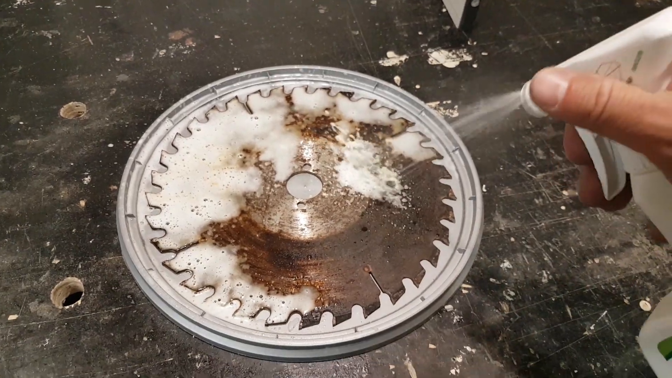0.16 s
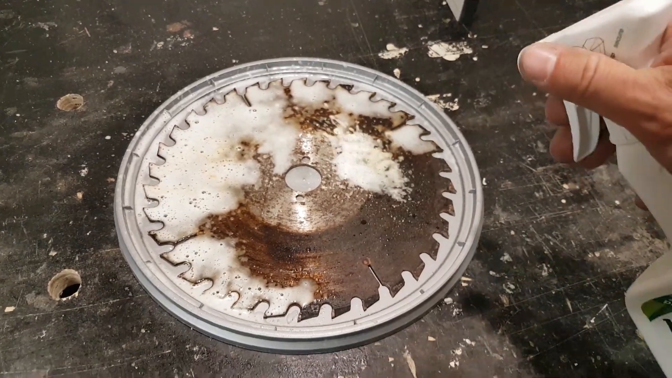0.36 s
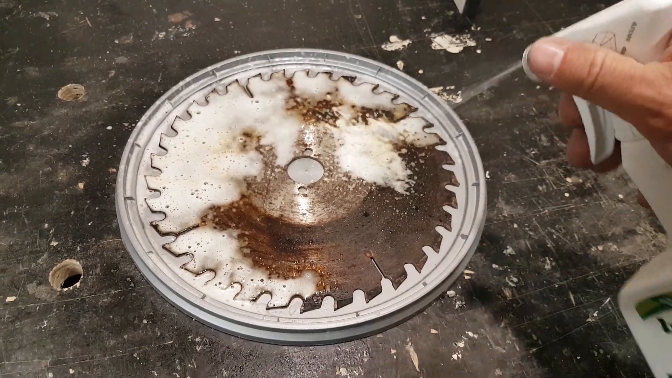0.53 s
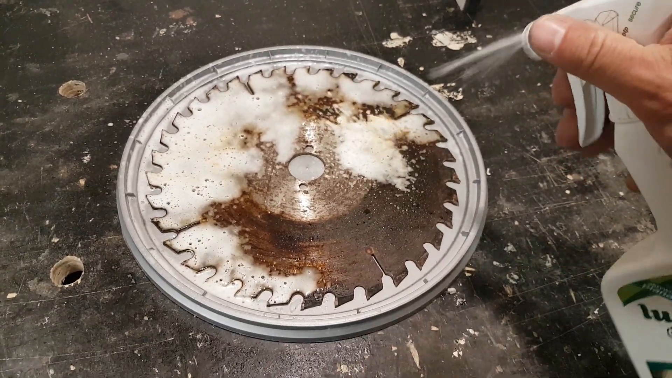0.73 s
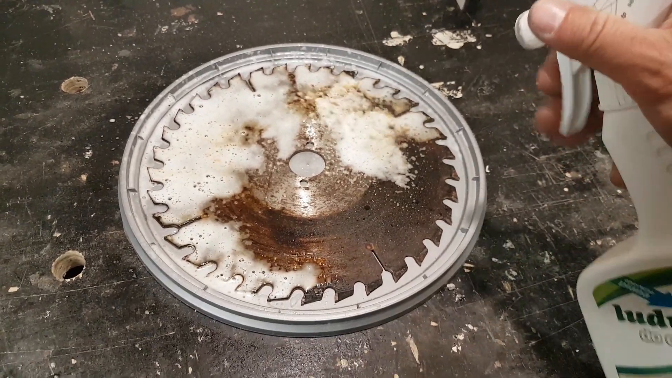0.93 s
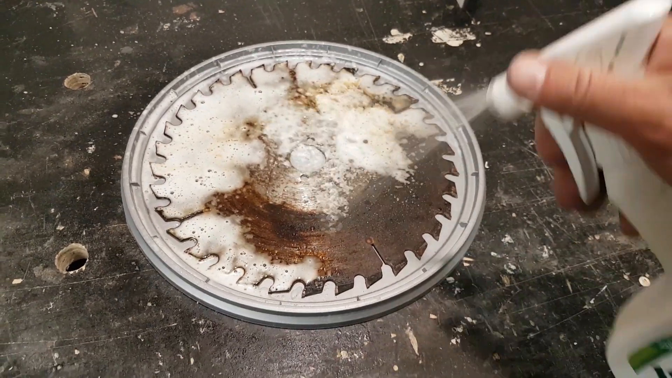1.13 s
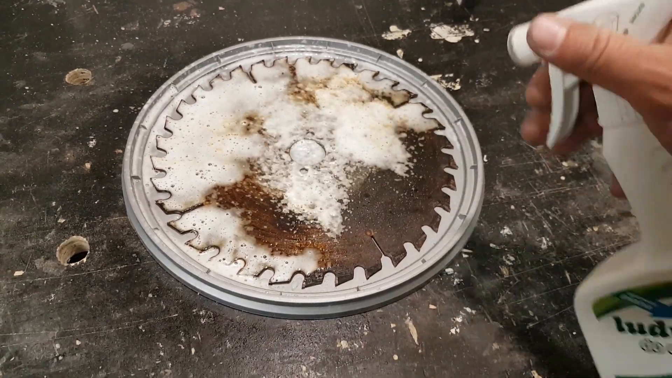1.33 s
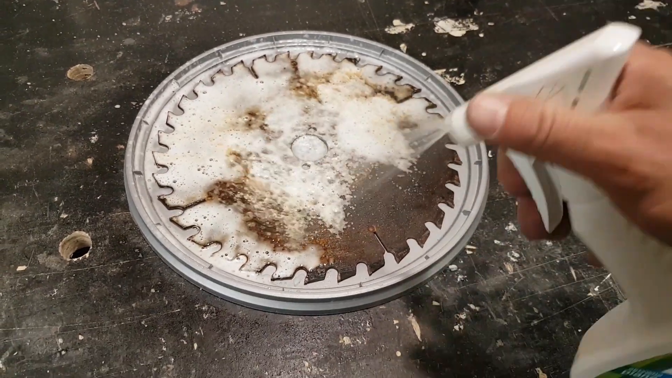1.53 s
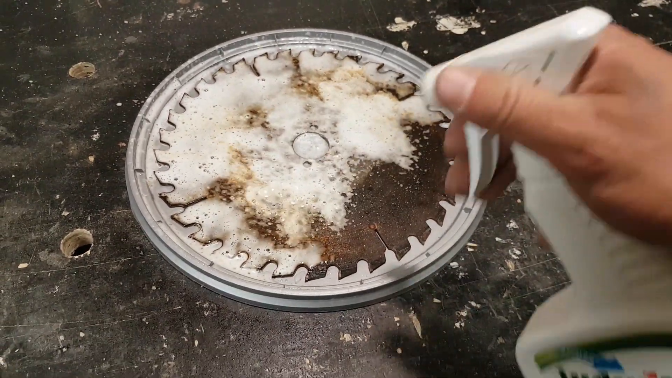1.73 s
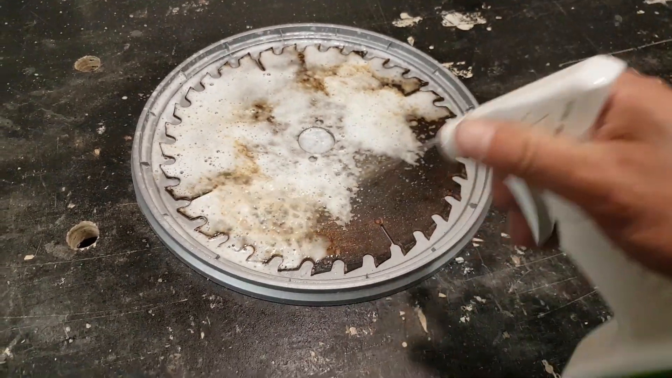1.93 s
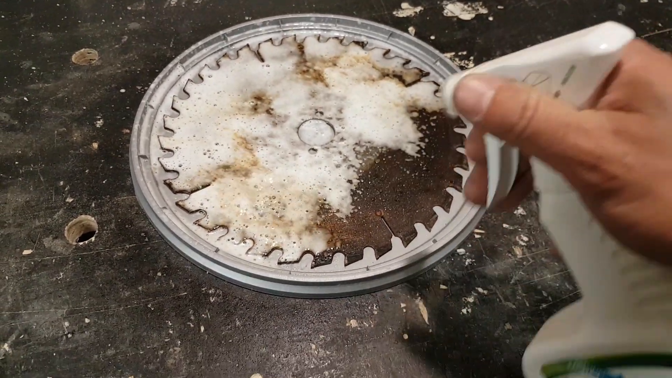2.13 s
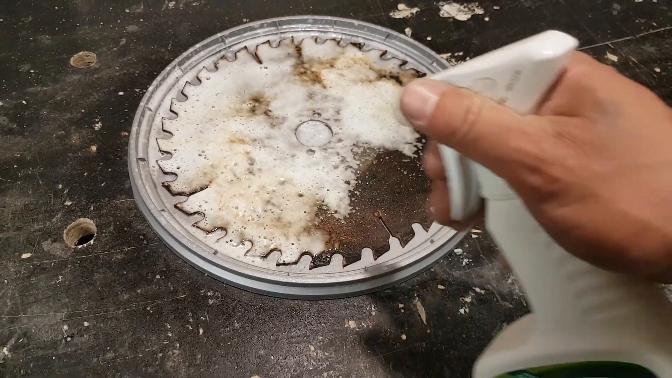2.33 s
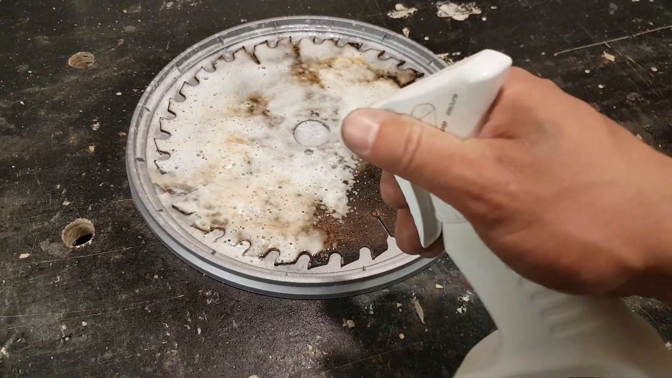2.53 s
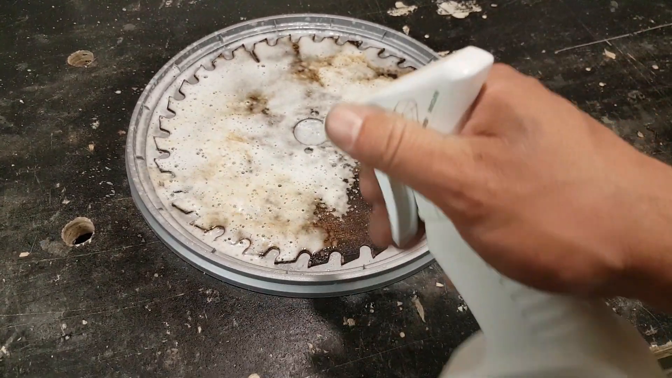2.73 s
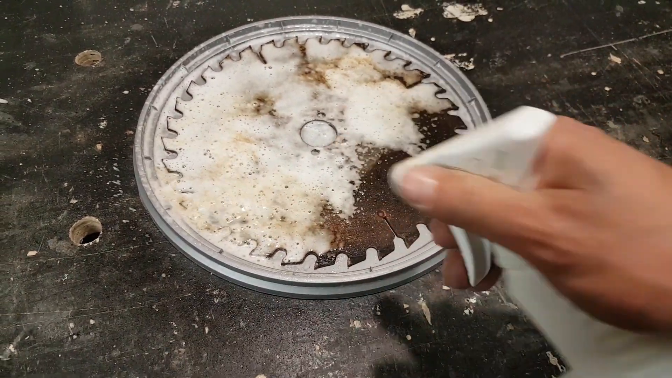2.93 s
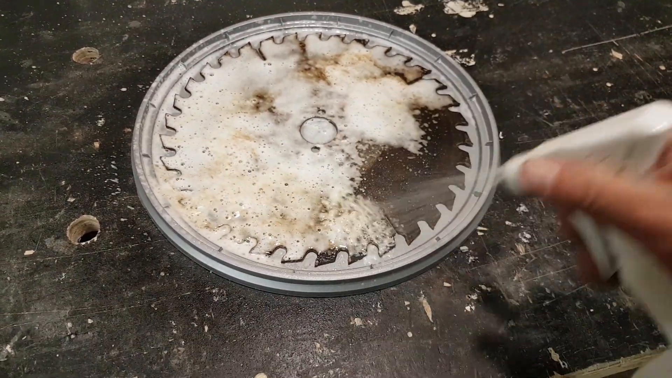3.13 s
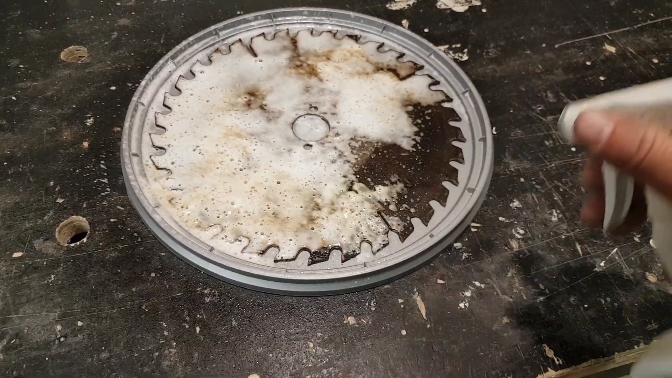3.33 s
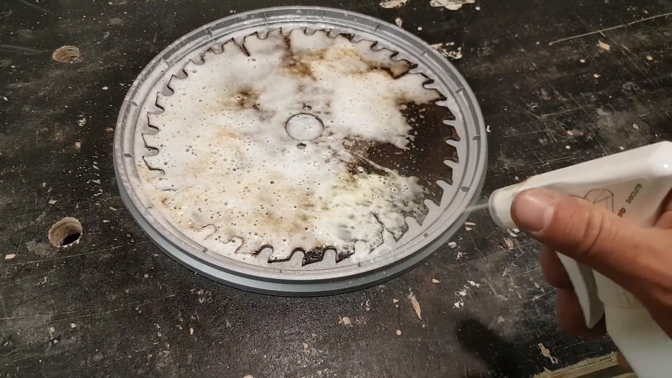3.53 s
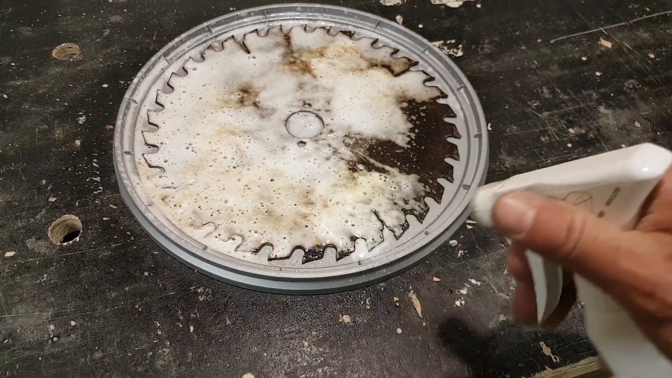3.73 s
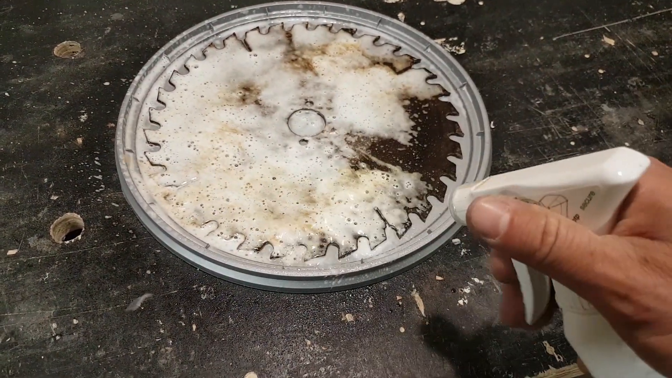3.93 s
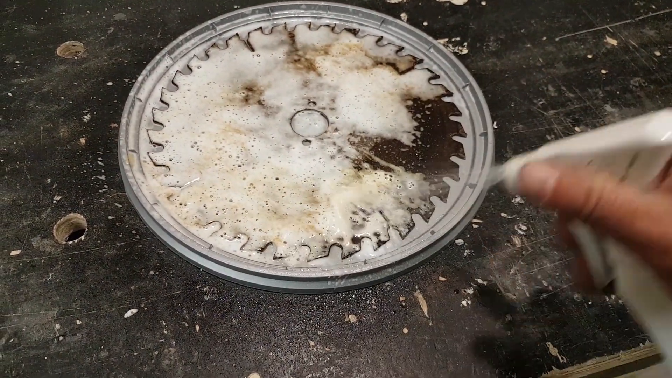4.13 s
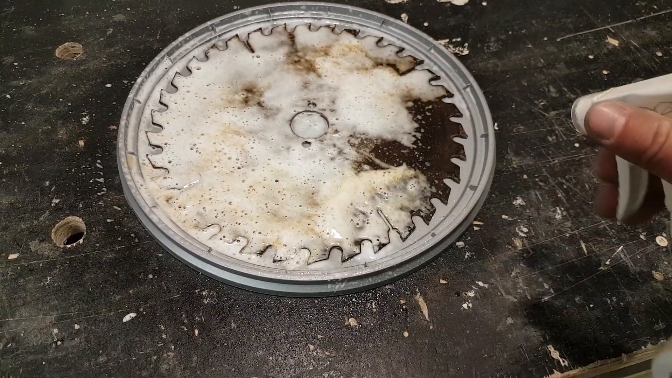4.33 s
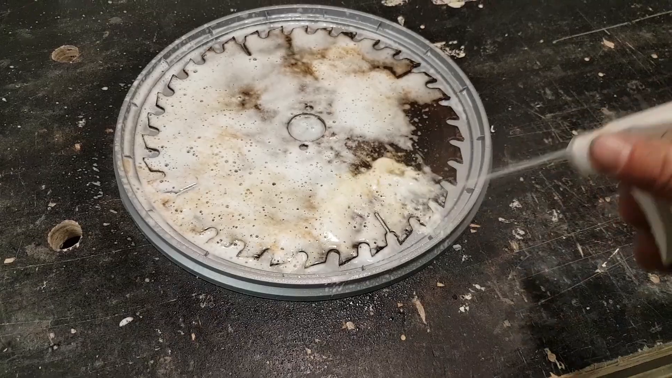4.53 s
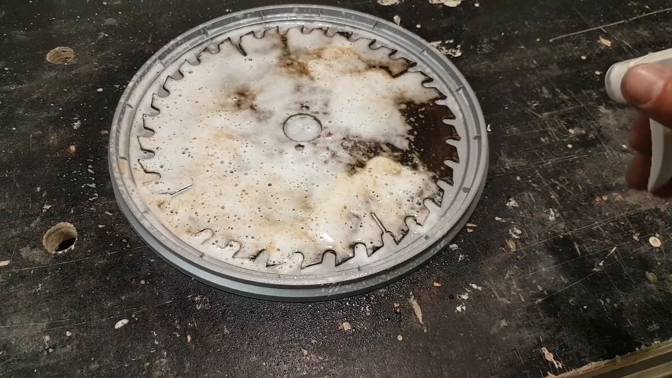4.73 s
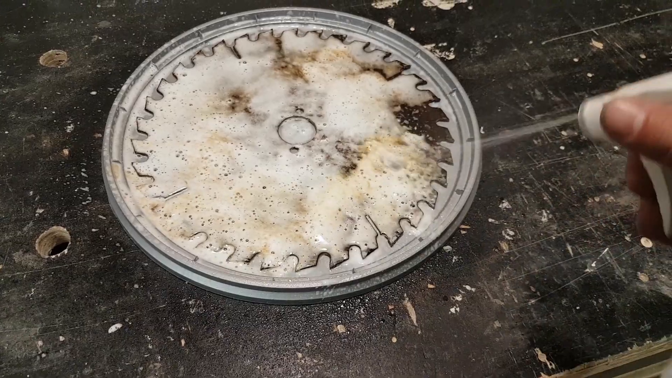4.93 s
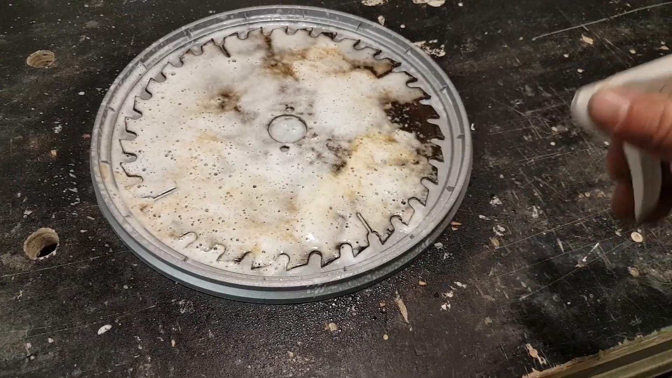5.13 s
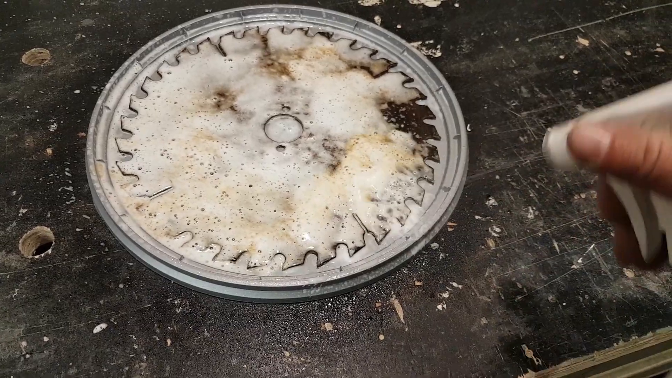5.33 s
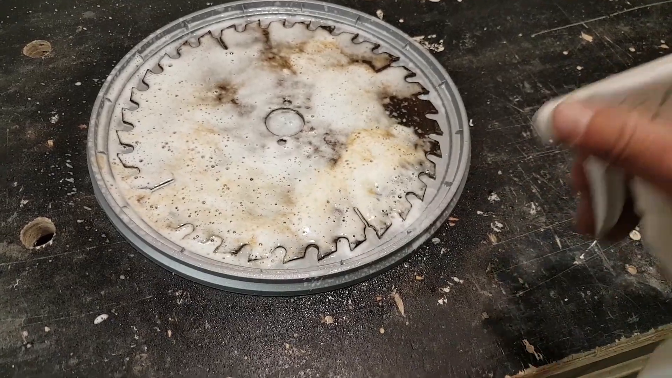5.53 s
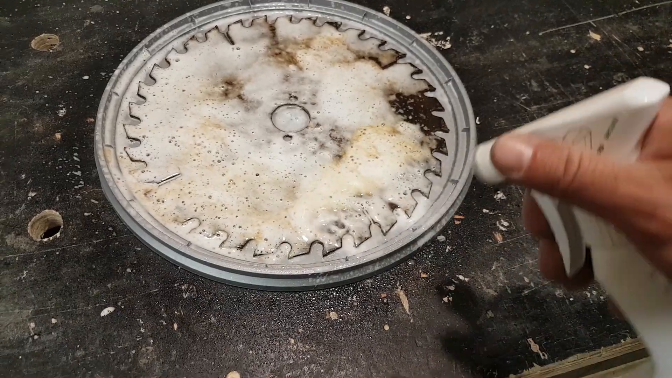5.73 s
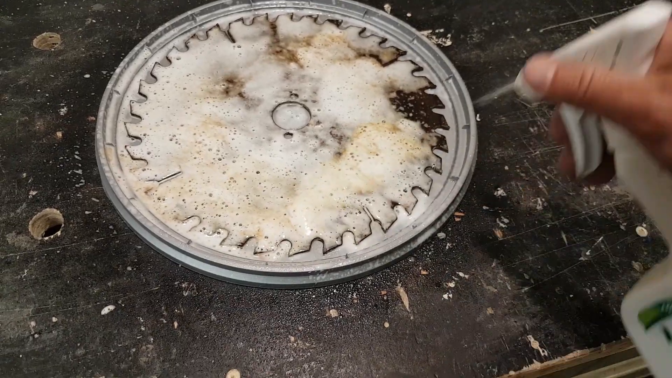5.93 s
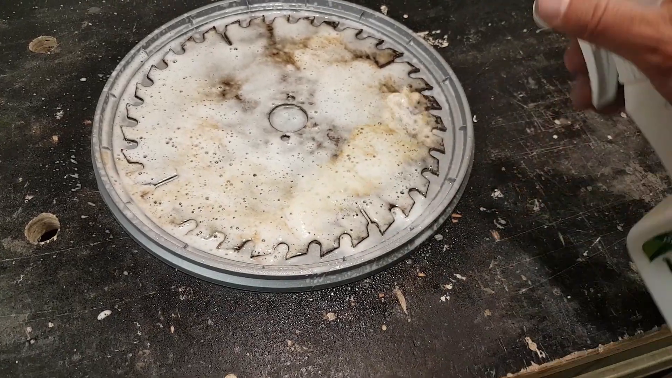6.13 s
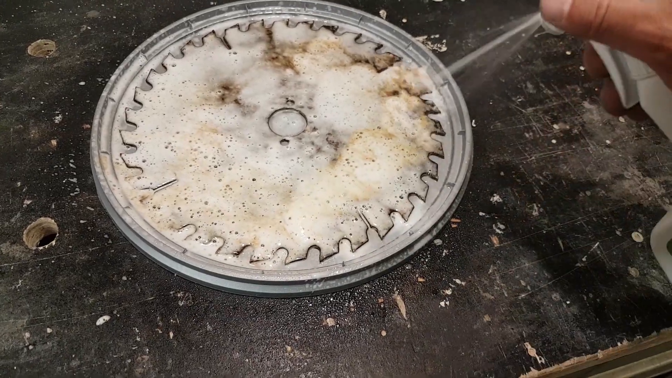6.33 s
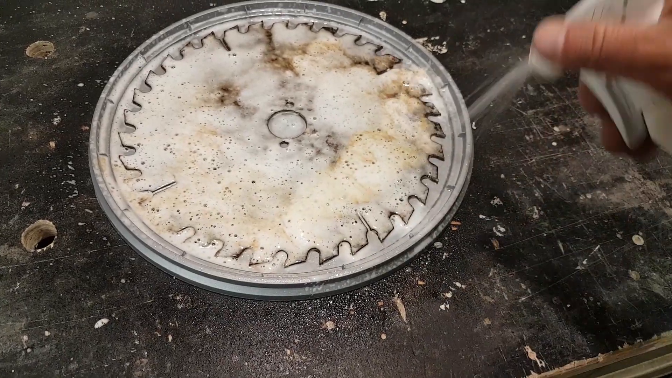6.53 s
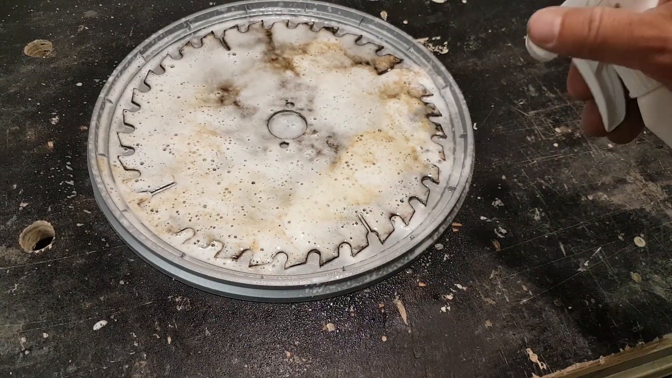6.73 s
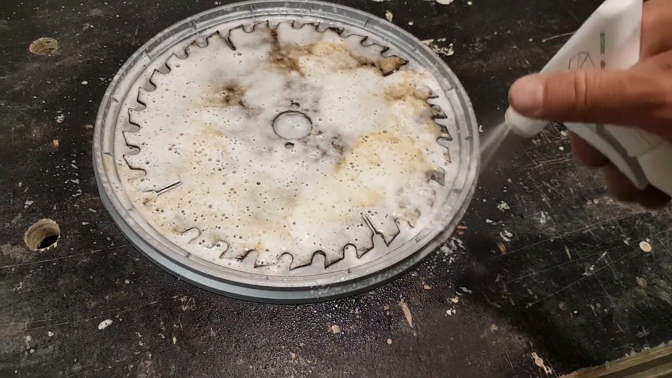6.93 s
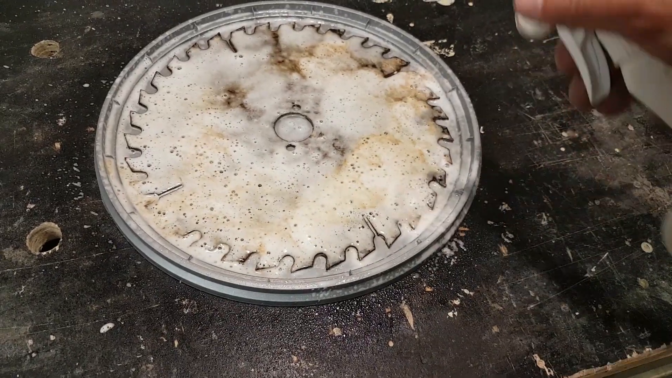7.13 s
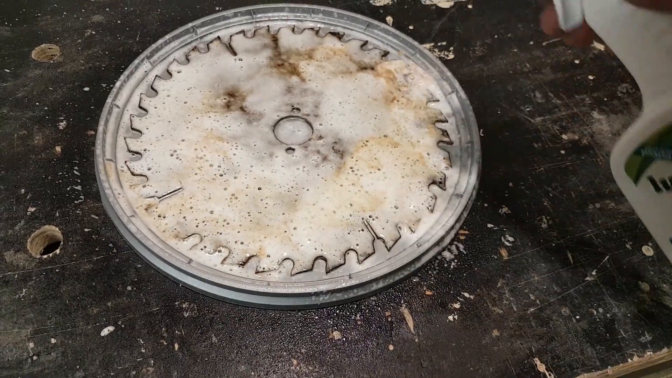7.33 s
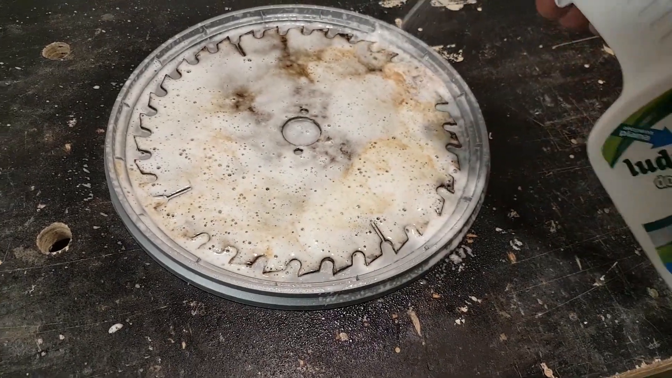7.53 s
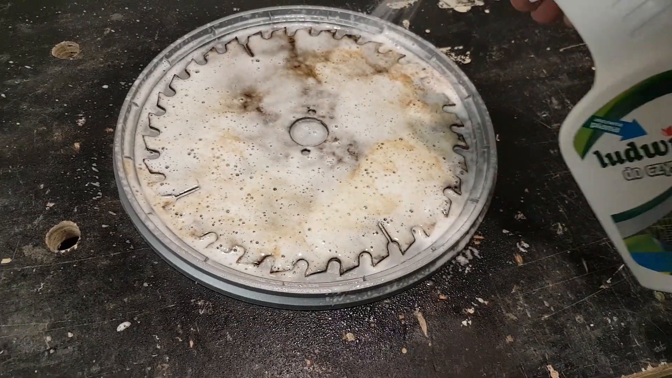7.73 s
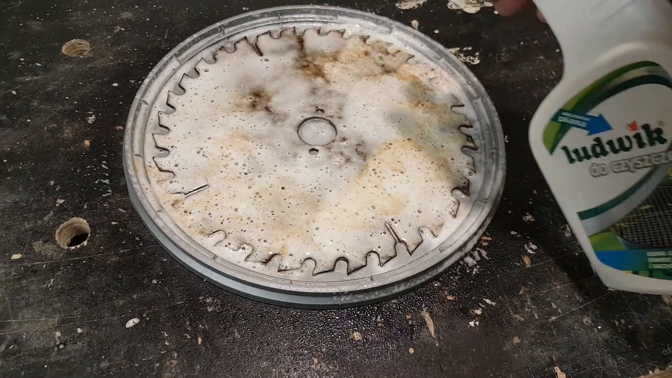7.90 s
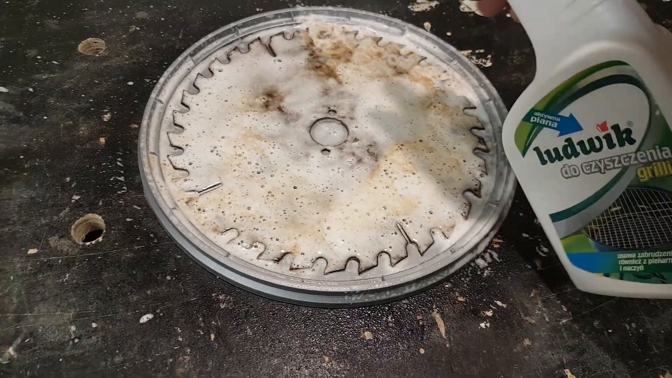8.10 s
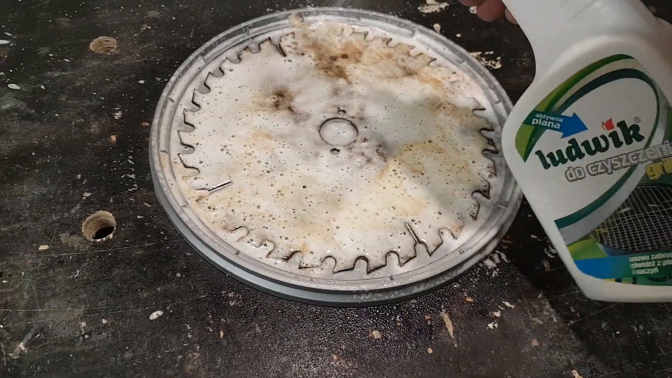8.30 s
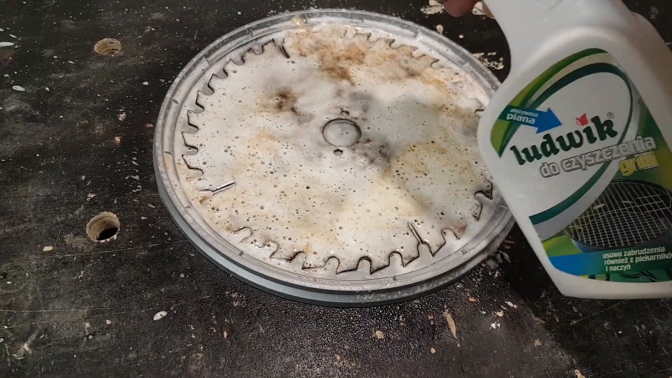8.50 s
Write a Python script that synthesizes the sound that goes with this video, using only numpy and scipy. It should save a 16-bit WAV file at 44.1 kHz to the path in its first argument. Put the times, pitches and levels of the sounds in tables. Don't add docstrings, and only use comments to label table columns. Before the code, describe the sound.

A hand pumps a spray bottle about three times a second, short bright hisses landing in foam, in a quiet small workshop.

```python
import sys
import numpy as np
from scipy import signal
from scipy.fft import rfft, irfft, next_fast_len
from scipy.io import wavfile
from scipy.ndimage import uniform_filter1d, map_coordinates

SR = 44100
rng = np.random.default_rng(int(sys.argv[2]) if len(sys.argv) > 2 else 0)


def unload_audio(sound):
    columns = np.transpose(np.atleast_2d(sound))
    steps = np.round(np.clip(columns, -1, 1) * 32767)
    wavfile.write(sys.argv[1], SR, steps.astype(np.int16))


def convert_level_to_amplitude(level_db):
    exponent = np.asarray(level_db, float) / 20
    return 10 ** exponent


N = 381906
T = np.arange(N) / SR

# (start [s], end [s], hiss level [dB], swell [dB/s])
SQUEEZES = [(0.122, 0.273, -27, -43), (0.475, 0.579, -27.5, -25), (0.766, 0.904, -26.5, 9),
            (1.094, 1.264, -20.5, 7), (1.486, 1.644, -21, -42), (1.832, 1.978, -19, -2),
            (2.209, 2.354, -20.5, -49), (2.516, 2.615, -21, -19), (2.791, 2.907, -21, 20),
            (3.091, 3.213, -20, -3), (3.421, 3.597, -23, -30), (3.805, 3.932, -22, -44),
            (4.118, 4.234, -21.5, -66), (4.432, 4.6, -23.5, -48), (4.82, 4.986, -24, -34),
            (5.198, 5.374, -26, -44), (5.609, 5.75, -23.5, -42), (5.98, 6.109, -22.5, -46),
            (6.287, 6.398, -22.5, 16), (6.569, 6.67, -24, 19), (6.871, 7.014, -24.5, -48),
            (7.202, 7.321, -27, -34), (7.474, 7.578, -26, -16), (7.734, 7.84, -27, -54),
            (7.999, 8.104, -27, 17), (8.27, 8.382, -27, -6), (8.553, 8.66, -26.5, -60)]
# (splash [dB], jet [dB], whistle [dB], low over high jet [dB])
AIM = [(-41, -6, -8, -2.5), (-46, -5.5, -8.5, -3), (-41, -4.5, -6.5, -4.5), (-37, -11.5, -11, 0),
       (-38.5, -11.5, -12.5, 0.5), (-38, -12.5, -12, 1), (-37.5, -10, -11.5, 0), (-38, -10.5, -8.5, 4.5),
       (-38.5, -11, -9.5, 2), (-36.5, -14, -11, -11), (-35.5, -12, -10, -16), (-37, -9, -10, -7.5),
       (-38.5, -11, -8.5, -8.5), (-35.5, -12, -11.5, -25), (-37.5, -9, -9, -7), (-35.5, -8, -9.5, -6),
       (-37.5, -7, -9, -11), (-39, -9, -10.5, -22), (-31.5, -5.5, -7.5, -18), (-32.5, -8.5, -5.5, -12),
       (-32, -8.5, -7, -8.5), (-36, -3.5, -10, -12), (-37.5, -4.5, -10.5, -7), (-34.5, -4, -9.5, -4),
       (-36.5, -5, -9.5, -7), (-39, -5.5, -9.5, -2), (-37, -5.5, -11.5, 4)]
# (jet core [dB], valley trim [dB], needle [dB], rise trim [ms])
TONE = [(-9.5, 0, -10, 0), (-8, 0, -10, 0), (-11, 2, -12, 0), (-8, -1, -9.5, 0), (-9, -2, -9, 0),
        (-9.5, -1, -11, 0), (-10, 0.5, -11, 0), (-9, 2, -9, 0), (-12, 1, -8, 0), (-10, 0, -9, 0),
        (-6, 2, -14, 0), (-6, -0.5, -10, 0), (-14, 1.5, -8, 0), (-12, 1, -12, 0.0042), (-5, 0.5, -11, 0),
        (-9, 1.5, -16, 0), (-6, -1, -12, 0), (-7, 0, -10, 0), (-6, 0, -12, 0), (-12, 0.5, -10, 0),
        (-10, 1, -8, 0), (-0.5, -1, -14, 0), (1.5, -0.5, -7, 0), (-0.5, 2, -5, 0), (-0.5, 1.5, -5, 0),
        (-2.5, 0, -8, 0), (-3, 0.5, -4, 0)]
# (lead [microseconds], likeness to the left [0-1])
FAR_PORT = [(100, .5), (105, .55), (100, .6), (90, .5), (80, .4), (75, .4), (70, .45), (25, .5), (15, .45),
            (30, .3), (50, .4), (115, .4), (120, .4), (65, .45), (60, .5), (55, .5), (100, .45), (135, .6),
            (130, .55), (125, .7), (110, .7), (110, .45), (80, .5), (60, .25), (60, .2), (70, .25),
            (45, .3)]
# (time [s], nozzle pan [dB], dish pan [dB], whistle turn [dB])
HAND = [(0.1, 9, 11.5, -5.5), (1.1, 11, 7.5, -3), (1.85, 13, 11.5, -1.5), (2.5, 17, 13, -1),
        (3.1, 13.5, 10, -6), (4.1, 12.5, 9, -7.5), (4.45, 9.5, 8, -9.5), (4.8, 10.5, 10.5, -14.5),
        (5.6, 12, 9.5, -3.5), (6.0, 12.5, 11, -10), (6.55, 8.5, 9, -24), (7.2, 7, 11, -7),
        (7.75, 9, 12.5, -3.5), (8.6, 7.5, 9.5, -10)]
# (time [s], flight [s], low over high splash [dB], low over high mist [dB])
DISH = [(0.1, 0.021, -3, -4.5), (.47, 0.028, 1, -6), (.77, 0.024, -4, -2.5), (1.1, 0.028, -6, -5),
        (1.5, 0.017, -5.5, -7.5), (2.2, 0.025, -7.5, -11), (2.5, 0.032, -6, -5), (3.1, 0.031, -9, -4.5),
        (3.4, 0.049, -6, -4.5), (4.2, 0.037, -8, -3), (5.2, 0.052, -3.5, -4), (5.98, 0.033, -8, -1.5),
        (6.3, 0.049, -3, 2), (6.6, 0.046, -1, 2), (7.5, 0.042, -7.5, -6), (8.6, 0.043, -3, -8)]
# (centre [Hz], width [Hz], level [dB])
MIST = [
    [(12040, 1960, 0)],
    [(13560, 2260, 2), (15400, 990, 1)],
]
# (centre [Hz], width [Hz], level [dB])
VALLEY = [(4790, 1120, -4.5), (9460, 2430, -3)]
# (centre [Hz], width [Hz], level [dB])
NEEDLE = [(13700, 1000, 0)]
# (centre [Hz], width [Hz], level [dB])
WHISTLE = [
    [(6460, 1160, 0.5)],
    [(7603, 1100, 0)],
]
# (centre [Hz], width [Hz], level [dB])
JET = [
    [(3010, 1000, -2)],
    [(4300, 3400, 0)],
]
# (time [s], peak [dB])
SPITS = [(0.1365, -28), (0.5395, -25), (0.6065, -43), (1.2893, -22.5), (1.6602, -27), (1.796, -35),
         (2.0027, -25), (2.9357, -29), (2.9426, -30), (3.2365, -6), (3.2427, -14), (3.2499, -16),
         (3.2582, -28), (3.6289, -38), (4.2512, -4.5), (4.6088, -9), (4.6245, -29), (4.6358, -27),
         (4.6513, -26), (5.027, -14), (5.0318, -15), (5.379, -38), (5.7714, -25), (6.6922, -10),
         (7.0305, -22), (7.621, -20), (7.8603, -26), (7.8638, -17), (8.1317, -18), (8.3995, -33)]
# (time [s], level [dB], pitch [Hz])
GLUGS = [(0.73, -64, 1700), (1.796, -40, 3100), (6.425, -35.5, 1480), (1.171, -42, 520),
         (1.185, -25.5, 1800), (1.196, -35, 1150), (1.205, -26.5, 1800), (6.341, -25.5, 1370),
         (6.342, -24, 2280), (6.366, -27, 1210), (6.378, -24, 2490)]
# (time [s], peak [dB], snap [dB], slurp [dB])
TRIGGER = [(0.316, -38.5, -8, -57), (0.634, -41.5, -7, -63), (0.954, -38.5, -6, -54.5),
           (1.312, -40, -5.5, -51.5), (1.686, -37.5, -4.5, -52), (2.027, -38, -3, -52.5),
           (2.4, -38.5, -7, -59), (2.666, -39.5, -4, -65), (2.965, -36.5, -5.5, -53),
           (3.27, -38, -6, -51.5), (3.654, -37, -6, -52.5), (3.987, -38.5, -6.5, -62.5),
           (4.292, -38, -4, -49), (4.651, -39, -6.5, -53.5), (5.039, -38.5, -5, -58),
           (5.427, -40.5, -5, -58), (5.826, -38.5, -10.5, -63), (6.162, -36.5, -6.5, -56),
           (6.461, -36, -8.5, -63), (6.729, -37, -8, -55), (7.064, -34.5, -13, -49.5),
           (7.365, -37, -10, -60), (7.627, -35, -9, -54), (7.887, -37, -8.5, -53), (8.151, -36, -9, -53),
           (8.433, -38, -8, -59)]
# (centre [Hz], width [Hz], level [dB])
DIP_TUBE = [(1800, 2100, 2), (8000, 3000, -3.5), (13340, 2700, 0)]
# (time [s], peak [dB])
BALL_LIFTS = [(1.175, -45), (2.473, -45.5), (2.5, -51), (2.741, -54), (3.365, -49), (3.743, -48.5),
              (4.387, -45.5), (5.079, -46), (6.522, -44), (6.814, -53), (7.16, -46.5), (7.426, -45.5),
              (7.694, -43), (7.719, -44), (7.955, -43), (8.221, -41.5)]
# (time [s], peak [dB])
BALL_SEATS = [(0.078, -47.5), (1.074, -52), (1.784, -54), (2.768, -46), (3.044, -44), (3.07, -49),
              (3.777, -51), (4.096, -44), (5.932, -50), (5.963, -51), (6.549, -41), (6.85, -46.5),
              (7.182, -57), (7.456, -44), (7.98, -45), (8.251, -46), (8.501, -42.5), (8.534, -43.5)]
# (centre [Hz], width [Hz], level [dB])
BOTTLE = [(211, 133, -0.5), (327, 75, 2.5), (495, 33, -0.5), (722, 88, -5.5)]
# (time [s], peak [dB], brightness [dB])
THUDS = [
    (.733, -35, -17.5),
    (6.195, -23.5, -7),
    (6.223, -32.5, -5),
    (6.243, -34, -18),
    (6.272, -35, -22),
]
# (centre [Hz], width [Hz], level [dB])
FLOORBOARD = [(101, 7.1, -7), (135, 19.5, 4), (226, 26, 0), (340, 65, -8), (520, 45, -10), (644, 50, -11.5)]
# (frequency [Hz], level [dB])
SHADOW = [(500, 34), (1500, -6), (3000, -7.5), (5500, 11.5), (7600, -2.5), (10000, 2), (14000, 0)]
# (frequency [Hz], t60 [s])
WORKSHOP = [(100, 0.46), (500, 0.47), (2000, 0.58), (8000, 0.34), (15000, 0.25)]
# (time [s], level [dB])
MURK = [(0, -68.5), (.3, -66.5), (1.5, -64.5), (2.45, -62.5), (4.3, -65), (5.3, -64), (5.7, -67),
        (6.24, -63.5), (7.5, -62.5), (8.66, -64.5)]
# (frequency [Hz], density [dB/Hz])
MURK_COLOUR = [(20, -23.5), (60, -5.5), (150, -1.5), (320, -1), (430, -3), (520, -2.5), (650, -3.5),
               (900, -12), (1300, -10.5), (3000, -17), (8000, -33), (15000, -29)]
# (time [s], level [dB], length [s])
PUFFS = [
    (0.793, -70, 0.17),
    (4.003, -51, 0.14),
    (5.06, -61, .07),
    (5.38, -64, .12),
    (6.253, -66, 0.26),
]
# (frequency [Hz], density [dB/Hz])
PUFF_COLOUR = [(15, -8), (40, -10), (70, -12.5), (140, -26), (300, -86.5)]
# (frequency [Hz], left-right likeness [0-1])
ALIKE = [(30, 0.17), (70, 0.64), (200, 0.7), (500, 0.68), (1500, 0.062), (5000, 0.051)]

SQUEEZE = (np.searchsorted(np.array(SQUEEZES)[:, 0], T) - 1).clip(0)


def spray():
    nozzle_pan_db, dish_pan_db, _ = held(HAND)
    spit = spits()
    nozzle = patchy(mist() + whistle(), depth_db=1.35) + [spit, 0 * spit]
    dish = patchy(jet() + splash(), depth_db=1.69)
    return ports(nozzle, nozzle_pan_db) + ports(dish, dish_pan_db)


def pressure():
    start, end, hiss_db, swell = each(SQUEEZES)
    rise_ms = (15.7 + each(TONE)[3] - 0.32 * swell).clip(5)
    since = (T - start - .0015).clip(0)
    build = 40 * np.log10(1e-4 + 1 - np.exp(-since / rise_ms * 1000))
    swelling = swell * (T - end).clip(None, 0)
    return build, swelling, hiss_db + swelling + build


def stop(steep, leak_db):
    _, end, _, swell = each(SQUEEZES)
    softness_s = 0.0037
    fall_db_per_ms = 0.35 - 0.00075 * swell
    collapse = fall_db_per_ms * 1500 * softness_s * np.logaddexp(0, (T - end) / softness_s)
    dribble_db = -230 * (T - end).clip(0)
    return convert_level_to_amplitude(-steep * collapse) + convert_level_to_amplitude(leak_db + dribble_db)


def mist():
    _, _, flow = pressure()
    _, valley_trim, needle_db, _ = each(TONE)
    mist_lean = held(DISH)[2]
    valley_db = -7.5 - 0.79 * held(HAND)[0]
    bright = hiss(MIST, mist_lean) + convert_level_to_amplitude(needle_db) * turbulence(NEEDLE, flutter_db=0.5)
    bright = convert_level_to_amplitude(flow - 1.82) * stop(1.55, -42.5) * bright
    broad = convert_level_to_amplitude(flow + valley_db + valley_trim - 0.5) * stop(0.82, -29)
    return bright + broad * turbulence(VALLEY, flutter_db=0.8)


def whistle():
    _, _, flow = pressure()
    level = convert_level_to_amplitude(flow + each(AIM)[2] - 0.5) * stop(1.0, -24.0)
    return level * hiss(WHISTLE, held(HAND)[2])


def jet():
    build, swelling, flow = pressure()
    _, jet_db, _, jet_lean = each(AIM)
    level = convert_level_to_amplitude(flow - 0.43 * build - 0.65 * swelling + jet_db - 2.5) * stop(0.84, -26.5)
    core_band = lambda f: 1 / (1 + (f / 4250) ** 30) / (1 + (2770 / (f + 1)) ** 20)
    core = unit(filtered(rng.standard_normal((2, N)), core_band))
    sleeve_band = lambda f: (0.25 + 1 / (1 + (f / 4450) ** 16)) / (1 + (2550 / (f + 1)) ** 12)
    sleeve = filtered(hiss(JET, jet_lean), sleeve_band)
    return level * (convert_level_to_amplitude(each(TONE)[0] - 4) * core + sleeve)


def splash():
    start, end, _, _ = each(SQUEEZES)
    build, _, _ = pressure()
    flight, splash_lean, _ = held(DISH)
    arrive, peak = start + flight, start + 0.7 * (end - start)
    level = each(AIM)[0] - 90 * np.hypot(T - peak, .012) + 0.12 * build - 0.96
    level = level - 7.6 * np.logaddexp(0, (arrive - T) / 0.01)

    def plops(mid_hz):
        return np.array([droplets(2000, mid_hz, spread=0.28, cycles=0.55, scatter_db=2.5) for _ in "LR"])

    foam = leaning(plops(1316), plops(2345), splash_lean)
    return convert_level_to_amplitude(level) * stop(0.33, -6.0) * filtered(foam, lambda f: 1 / (1 + (1200 / (f + 1)) ** 5))


def spits():
    start, end = np.array(SQUEEZES)[:, :2].T
    late, size = rng.random((len(SQUEEZES), 2)).T
    prime = pulses(start + .008, -42 + 8 * (late - .5))
    sputter = pulses(end + .02 + .04 * late, -36 + 8 * (size - .5))
    bursts = pulses(*np.transpose(SPITS)) + (prime + sputter)
    return filtered(bursts, modes([(12500, 7000, 4), (5000, 4000, -8)]))


def glugs():
    ring = np.zeros(N)
    for s, db, hz in GLUGS:
        after = (T - s).clip(0)
        ring += convert_level_to_amplitude(db - 5.4 * hz * after / 4) * np.sin(2 * np.pi * hz * after)
    return ring * convert_level_to_amplitude([[0], [-9.5]])


def pump():
    snap = [(933, 530, -12.5), (1337, 77, 2.5), (2100, 900, -15.5)]
    trigger = knocks(np.array(TRIGGER)[:, :3], BOTTLE, snap, body_db=34.5, edge_db=41.5, soft_hz=2220)
    ball = [(*row, -4) for row in BALL_LIFTS] + [(*row, -12) for row in BALL_SEATS]
    return trigger + knocks(ball, BOTTLE, [(820, 150, -5.5)], body_db=34.0, edge_db=43.0, soft_hz=1800)


def refill():
    s, db = np.array(TRIGGER)[:, ::3].T
    after_snap_s = 0.046
    nearest = np.searchsorted((s[1:] + s[:-1]) / 2 + after_snap_s, T)
    t = T - s[nearest] - after_snap_s
    level = convert_level_to_amplitude(db[nearest] + 4.0 - np.where(t < 0, 300, 500) * np.abs(t) - 6500 * t ** 2)
    return level * unit(filtered(rng.standard_normal((2, N)), modes(DIP_TUBE))) * convert_level_to_amplitude([[0], [-5.5]])


def slosh():
    middle_s, length_s = 7.87, 0.43
    lap = convert_level_to_amplitude(-61 - 11 * ((T - middle_s) / length_s) ** 2 + 3 * wobble(25))
    return lap * unit(filtered(rng.standard_normal(N), lambda f: modes([(520, 160, 0)])(f) ** 2))


def thuds():
    edge = [(1150, 360, -0.5), (1950, 250, 1.5), (2470, 440, -2.0)]
    return knocks(THUDS, FLOORBOARD, edge, body_db=42.0, edge_db=27, soft_hz=3560)


def room(x, wet_db):
    hz, t, z = signal.stft(rng.standard_normal((2, SR // 2)), SR, nperseg=256)
    decay = convert_level_to_amplitude(-60 * t / along(WORKSHOP, hz)[:, None])
    tail = signal.istft(z * decay, SR, nperseg=256)[1]
    late = np.pad(x, (250, 0))[None]
    wet = signal.fftconvolve(late, tail / np.linalg.norm(tail[0]), axes=1)[:, :N]
    return convert_level_to_amplitude(wet_db) * diffuse(wet, [(1000, 0.005)])


def background():
    squeezing = np.searchsorted(np.array(SQUEEZES)[:, :2].ravel(), T) % 2
    grip_db = 2.5 * uniform_filter1d(1. * squeezing, size=2000)
    murk_db = np.interp(T, *np.transpose(MURK)) + grip_db
    murk_db = 0.49 * wobble(2.29) + murk_db + 0.7 + 1.36 * wobble(8.9) + 2.93 * wobble(30)
    air = patchy(rng.standard_normal((2, N)), depth_db=1.5)
    murk = convert_level_to_amplitude(murk_db) * unit(diffuse(air, MURK_COLOUR))
    stir = convert_level_to_amplitude(-80.5 + 2.5 * wobble(5.3))
    stir = stir + sum(convert_level_to_amplitude(db - 20 * np.abs(T - s) / length) for s, db, length in PUFFS)
    puff = stir * convert_level_to_amplitude([[-2.5], [2.5]]) * unit(diffuse(rng.standard_normal((2, N)), PUFF_COLOUR))
    return murk + puff + convert_level_to_amplitude(-73.0) * rng.standard_normal((2, N))


def each(table):
    return np.array(table)[SQUEEZE].T


def held(table):
    s, *columns = np.transpose(table)
    return [np.interp(each(SQUEEZES)[0], s, c) for c in columns]


def unit(x):
    return x / np.sqrt(np.mean(x ** 2) + 1e-20)


def along(points, hz):
    f, v = np.transpose(points)
    return np.interp(np.log(hz + 1), np.log(f + 1), v)


def filtered(x, response):
    m = next_fast_len(N + SR // 2)
    return irfft(rfft(x, m) * response(np.fft.rfftfreq(m, 1 / SR)), m)[..., :N]


def modes(rows):
    def response(f):
        total = 0
        for k, (c, w, db) in enumerate(rows):
            total = total + (-1) ** k * convert_level_to_amplitude(db) * 1j * f * w / (c * c - f * f + 1j * f * w)
        return total
    return response


def wobble(rate):
    return map_coordinates(rng.standard_normal(int(N * rate / SR) + 4), [T * rate])


def pulses(times, db):
    return np.bincount((np.asarray(times) * SR).astype(int).clip(0, N - 1), convert_level_to_amplitude(db), N)


def turbulence(rows, flutter_db):
    noise = filtered(rng.standard_normal((2, N)), lambda f: modes(rows)(f) ** 2)
    return unit(noise * convert_level_to_amplitude(flutter_db * wobble(350) + 0.53 * wobble(45)))


def leaning(low, high, lean_db):
    return (convert_level_to_amplitude(lean_db) * low + high) / np.sqrt(1 + convert_level_to_amplitude(2 * lean_db))


def hiss(parts, lean_db):
    low, high = [turbulence(rows, flutter_db=1.3) for rows in parts]
    return leaning(low, high, lean_db)


def droplets(rate, mid_hz, spread, cycles, scatter_db):
    when, tone, size = rng.random((int(rate * N / SR), 3)).T
    hz = mid_hz * np.exp(spread * (2 * tone - 1))[:, None]
    t = np.arange(256) / SR
    level = convert_level_to_amplitude(-scatter_db * np.log(size + 1e-4))[:, None]
    plop = level * np.sin(2 * np.pi * hz * t) * np.exp(-t * hz / cycles) * (1 - np.exp(-t * hz))
    place = (when * N).astype(int)[:, None] + np.arange(256)
    return unit(np.bincount(place.ravel(), plop.ravel(), N + 256)[:N])


def knocks(events, body, edge, body_db, edge_db, soft_hz):
    s, db, rel_db = np.transpose(events)
    late, loss = rng.random((len(s), 2)).T

    def blow(at, level):
        return pulses(at, level) - pulses(at + 0.001 + 0.00299 * late, level - 3.5 - 10 * loss)

    low = filtered(blow(s + 0.0013, db + body_db), modes(body))
    high = filtered(blow(s + 0.00045, db + rel_db + edge_db), modes(edge))
    return filtered(low + high, lambda f: 1 / (1 + 1j * f / soft_hz) ** 3)


def patchy(pair, depth_db):
    z = signal.stft(pair, nperseg=256)[2]
    field = uniform_filter1d(rng.standard_normal(z.shape[1:]), size=3, axis=0)
    field = uniform_filter1d(field, size=56, axis=1)
    return signal.istft(z * convert_level_to_amplitude(depth_db * unit(field)), nperseg=256)[1][:, :N]


def delayed(x, microseconds):
    return map_coordinates(x, [np.arange(N) - microseconds * 1e-6 * SR], order=5, mode="nearest")


def ports(pair, pan_db):
    near, scatter = pair
    lead, share = each(FAR_PORT)
    far = share * delayed(near, -lead) + np.sqrt(1 - share ** 2) * scatter
    return np.array([near, convert_level_to_amplitude(-pan_db) * far])


def diffuse(pair, colour):
    def response(hz):
        turn = np.arccos(np.clip(along(ALIKE, hz), -1, 1)) / 2
        return convert_level_to_amplitude(along(colour, hz)) * [np.cos(turn), np.sin(turn)]
    mid, side = filtered(pair, response)
    return np.array([mid + side, mid - side])


def scene():
    near, far = spray()
    shaded = filtered(far, lambda hz: convert_level_to_amplitude(along(SHADOW, hz)))
    bottle = np.array([near, shaded]) + refill() + glugs() + room(near, [[-19], [-22]])
    knock, thud = pump(), thuds()
    knock = knock + room(knock, -9.5)
    thud = 0.95 * thud + room(thud, -4)
    return bottle + knock + thud + background() + slosh()


def low_pass(x):
    return signal.sosfilt(signal.butter(12, 16650, fs=SR, output="sos"), x)


def record(dry):
    limited = filtered(dry, lambda hz: 1 / (1 + (hz / 15900) ** 160))
    return low_pass(limited - .0005)


dry = scene()
out = record(dry)
unload_audio(out)
```